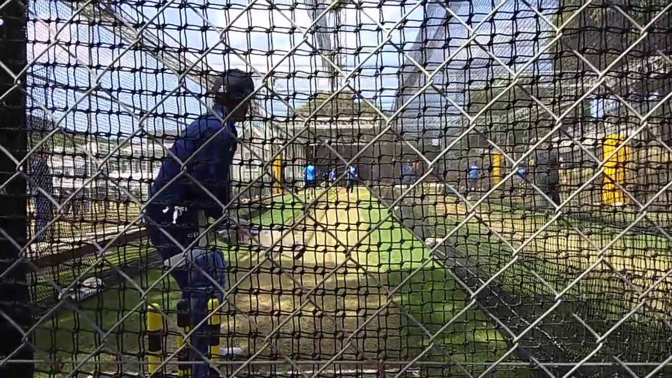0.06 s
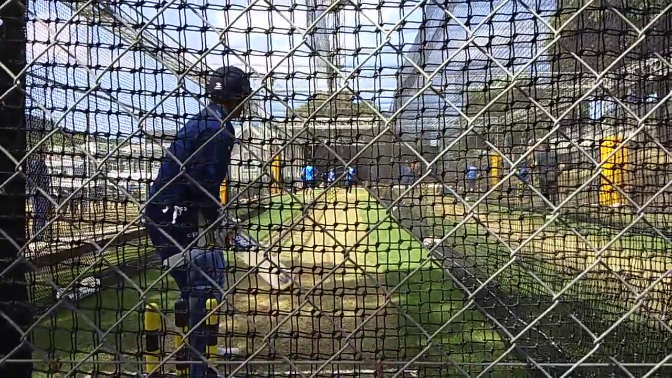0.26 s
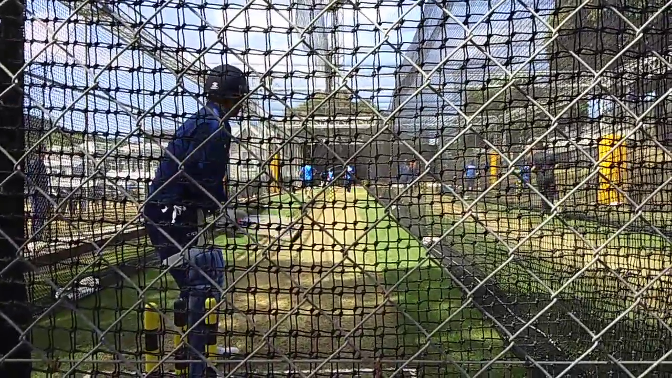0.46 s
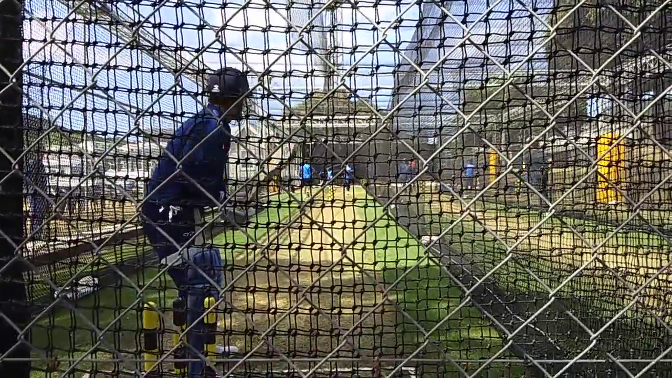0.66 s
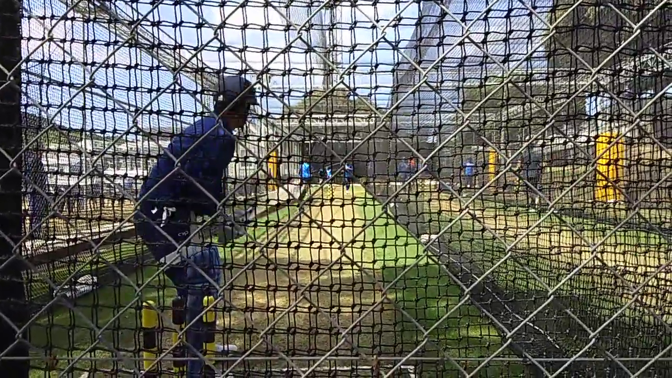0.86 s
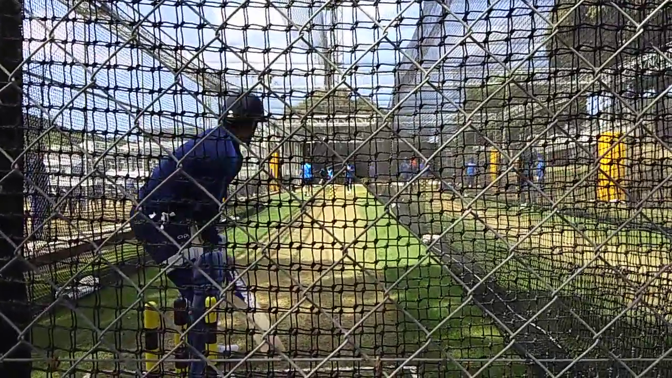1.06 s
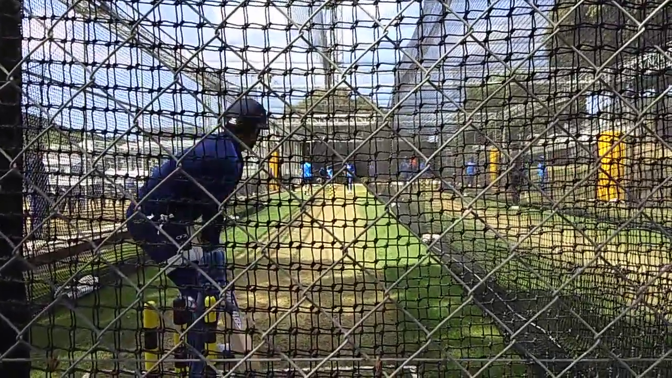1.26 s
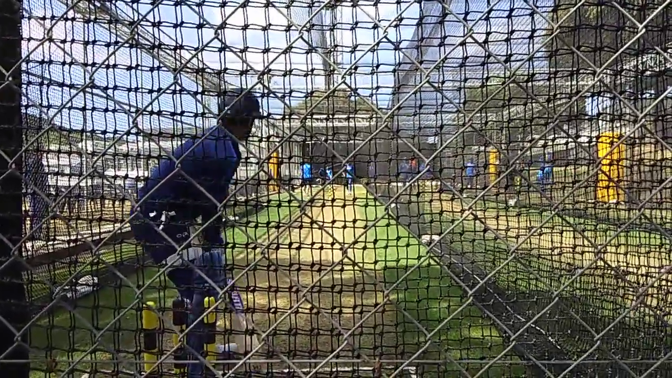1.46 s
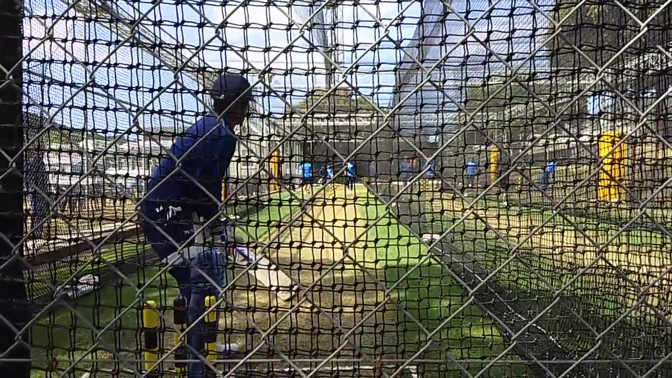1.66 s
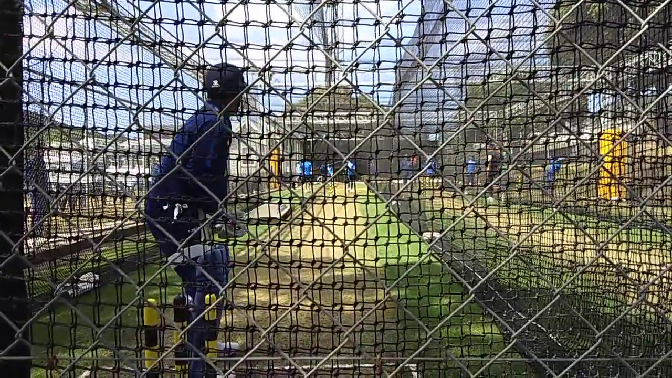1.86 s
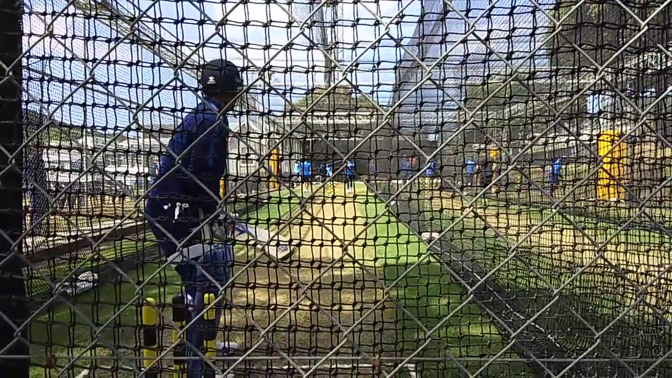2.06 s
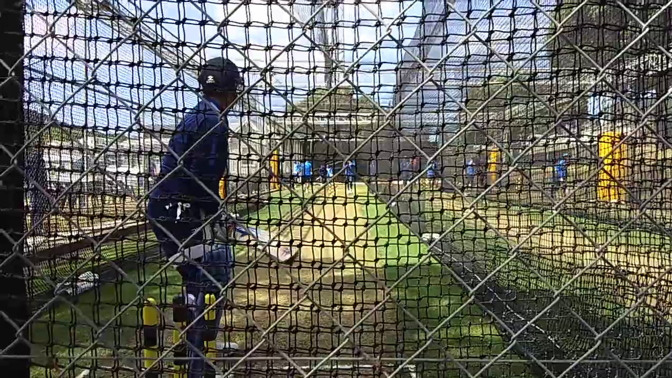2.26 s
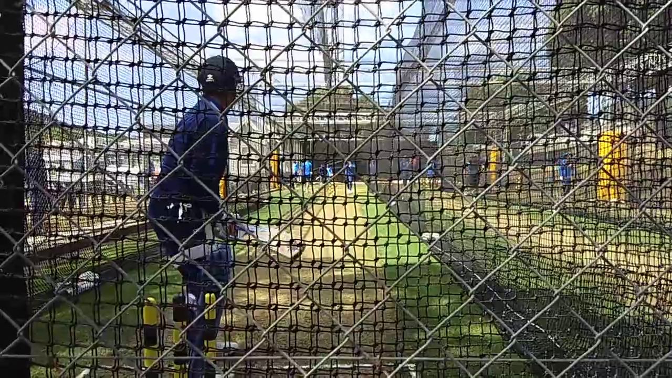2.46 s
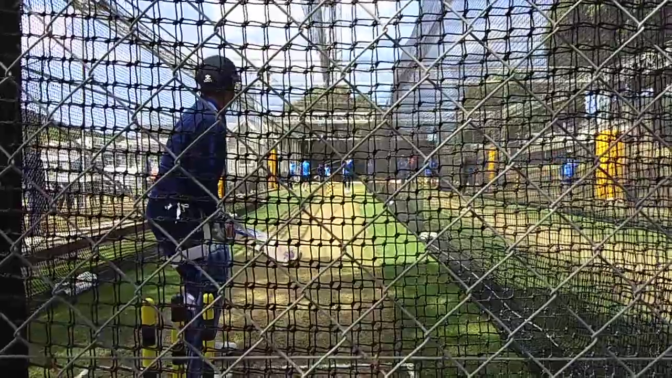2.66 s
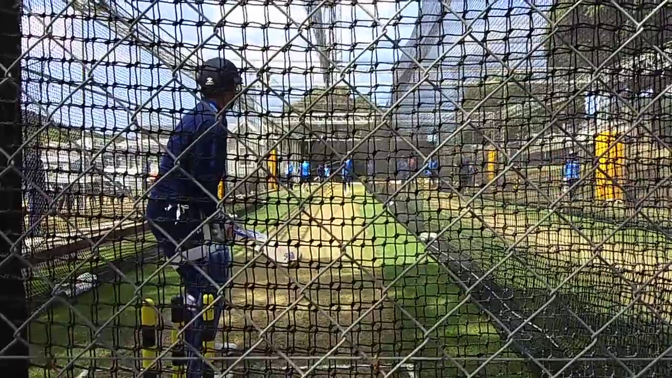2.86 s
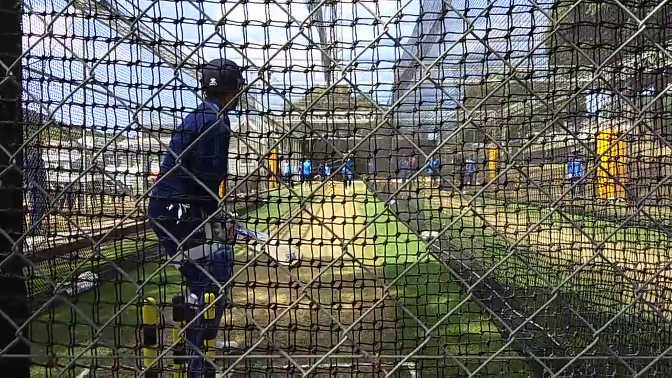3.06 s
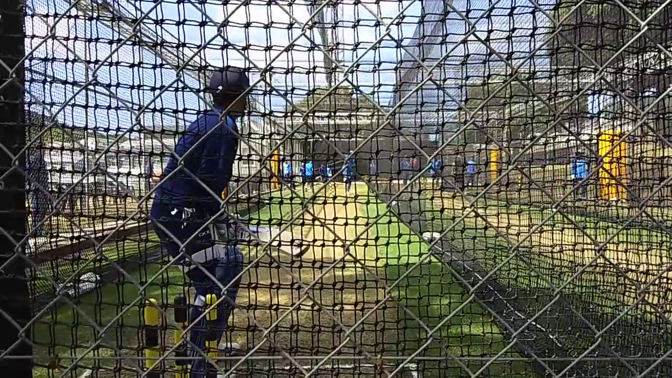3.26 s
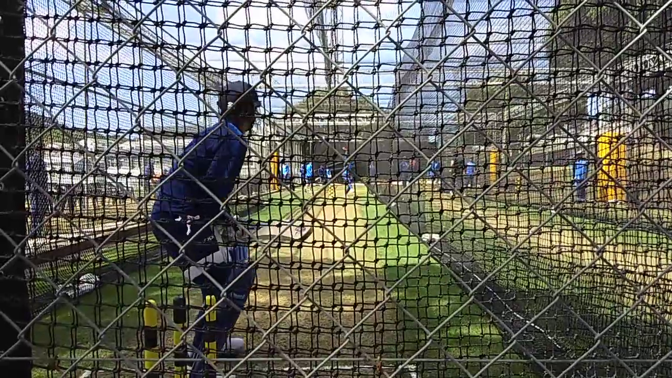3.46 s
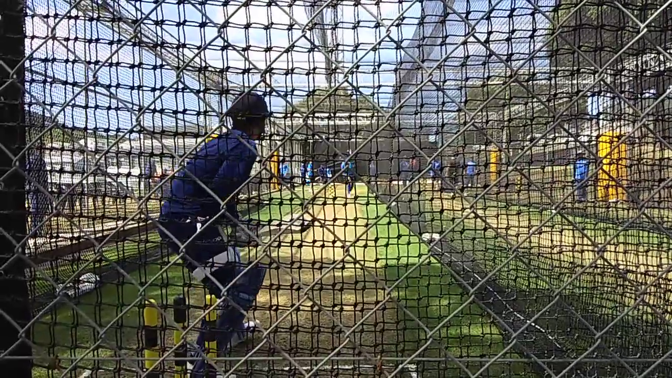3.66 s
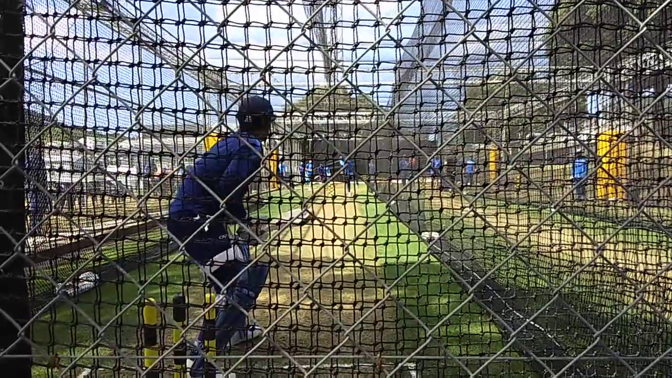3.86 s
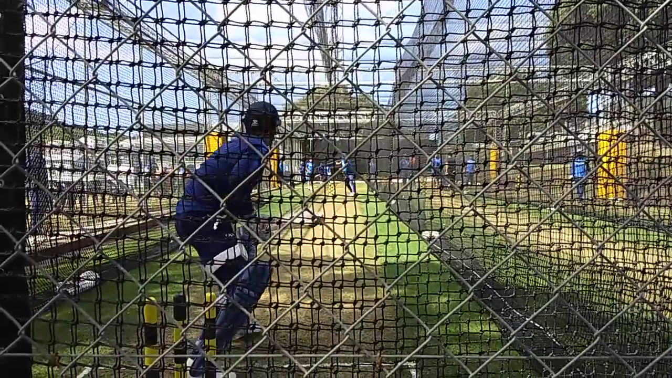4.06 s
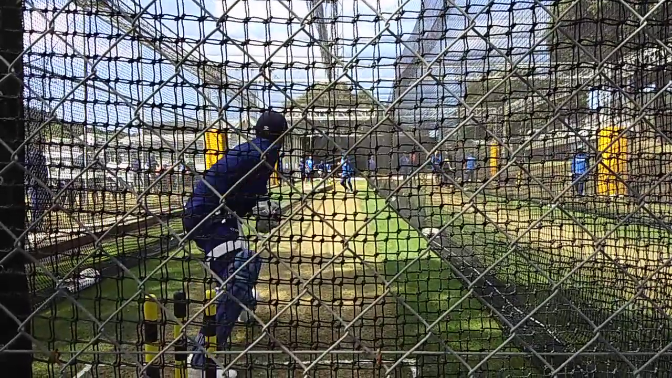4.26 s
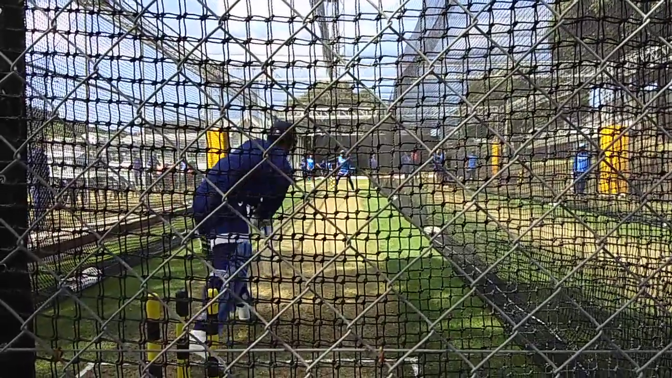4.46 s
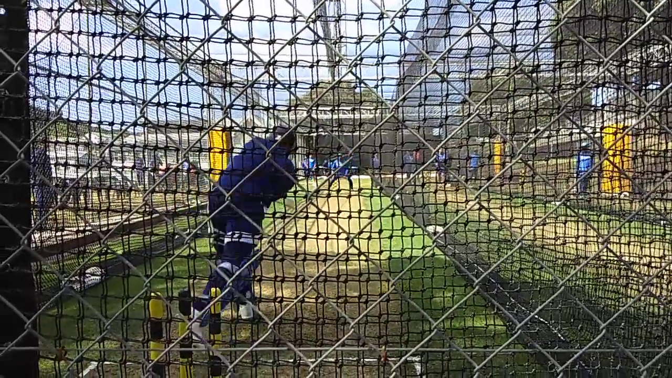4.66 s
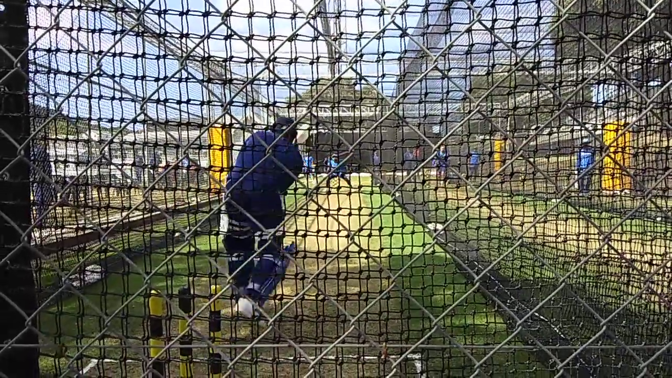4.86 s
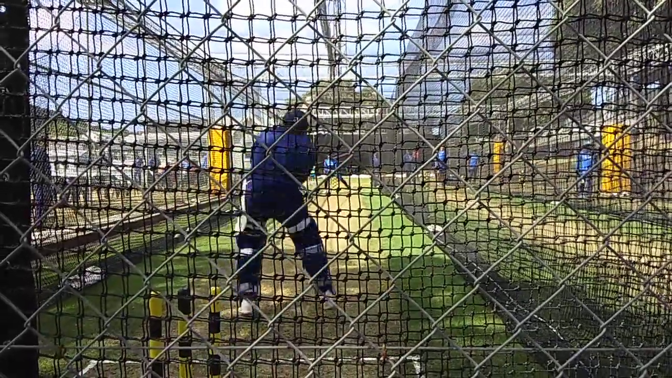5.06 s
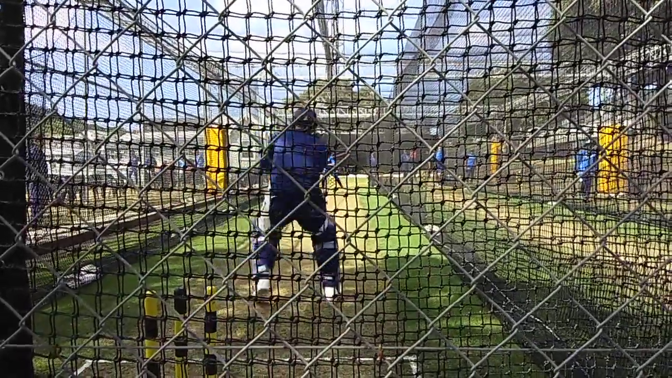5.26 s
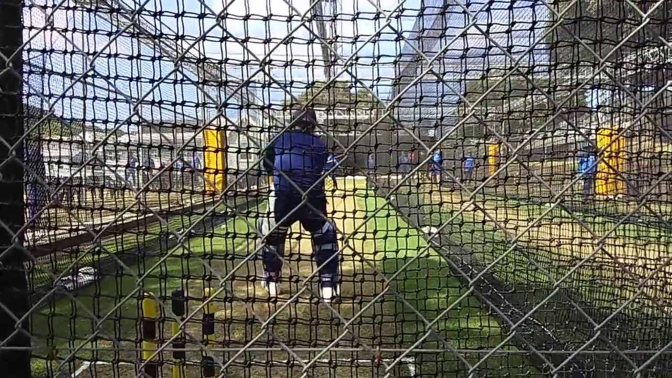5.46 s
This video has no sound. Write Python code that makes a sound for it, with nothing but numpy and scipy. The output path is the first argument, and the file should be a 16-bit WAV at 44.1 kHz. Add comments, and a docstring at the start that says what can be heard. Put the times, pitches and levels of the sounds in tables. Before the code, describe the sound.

Dull bat taps and thuds in outdoor cricket nets, a sharp crack from the next lane, then a louder near crack with slapping echoes.

```python
"""A bat cracks against a hard ball in the next lane, then in the near one, at outdoor cricket nets.
Each crack is a set of ringing blade tones under a noise snap; fences and stands return echoes of it.
Dull thuds of bat, feet and ball are short low tones; shoes, kit and treble spits are short noise
bursts, and netting shudders in soft beats. Behind lie faint knocks from far lanes and a city bed
of shaped noise with a thin whine. A phone microphone colours it and ducks after peaks."""
import sys
import numpy as np
from scipy import signal
from scipy.fft import rfft, irfft, next_fast_len
from scipy.io import wavfile
from scipy.ndimage import uniform_filter1d

SR = 44100
rng = np.random.default_rng(int(sys.argv[2]) if len(sys.argv) > 2 else 0)


def transcribe(signal):
    """Save signal, clipped to [-1, 1], as a 16-bit WAV file at the path in sys.argv[1]."""
    frames = np.atleast_2d(signal).T
    limited = np.clip(frames, -1, 1)
    pcm = np.round(limited * 32767).astype(np.int16)
    wavfile.write(sys.argv[1], SR, pcm)


N = 243431  # length in samples
T = np.arange(N) / SR  # time in seconds

# Bat on ball. Each row: start in seconds, level in dB, pitch of the blade tones as a ratio,
# time for the push to peak in ms, snap level in dB against the blade, left minus right in dB,
# lag of the left microphone port in ms.
CRACKS = [(2.134, -8.5, 1.18, 0.026, -5.5, -5.5, 0.28), (4.6160, 0, 1.077, 0.01, -6.5, 4, 0.025)]
# Tones of a willow blade. Each row: pitch in Hz, level in dB, time to fade by 60 dB in seconds.
BLADE_TONES = [(262.5, -14.5, .021), (686, -10.5, 0.017), (800, -4.5, 0.013), (1303, -8.5, .011),
               (1760, -17, .010), (2620, -30, .010), (3980, -9.5, 0.0087), (4640, -11.5, .009),
               (5220, -17, 0.0051)]
# Colour of splintery, gritty noise. Each row: frequency in Hz, level in dB.
SPLINTER_COLOUR = [(500, 8), (1000, 1), (2000, -9), (3200, -15), (4300, -8.5), (6500, -14), (8000, -16),
                   (10500, -9.5), (15500, -43)]
# Colour of the far echo, one list for each crack. Each row: frequency in Hz, level in dB.
FAR_COLOURS = [
    [(59, -53), (100, -19), (210, 0), (288, -5), (327, 0.5), (413, -3), (605, 5), (849, 3), (1010, -2),
     (1570, 2.5), (2450, -35.5), (5600, -21.5), (8190, -21), (14200, -46), (15800, -38)],
    [(59, -32), (100, 5), (156, 5), (205, 3), (295, -8), (342, -2), (511, -12), (673, 4), (1240, -16),
     (1750, -38), (2610, -16), (3030, -25), (4160, -14), (8370, -24), (15800, -41)],
]


def undb(db):
    """Turns decibels into a gain."""
    return 10 ** (np.asarray(db) / 20)


def pan(db):
    """Left and right gains for a level difference, left minus right."""
    return undb(np.array([[db], [-db]]) / 2)


def shape(points, hz):
    """Gain read from a table of Hz and dB, with straight lines on a log-frequency axis."""
    table_hz, table_db = np.transpose(points)
    return undb(np.interp(np.log(hz), np.log(table_hz), table_db))


def fade(t, t60):
    """A natural die-away that falls by 60 dB in t60 seconds."""
    return np.exp(-np.log(1000) * t / t60)


def add(out, s, sound):
    """Mixes a sound in, starting at s seconds."""
    i = int(round(s * SR))
    out[:, i:i + sound.shape[-1]] += sound[..., :N - i]


def wander(x, step):
    """A smooth random wander along x, with a new value every step."""
    knots = np.arange(0, x[-1] + step, step)
    return np.interp(x, knots, rng.standard_normal(len(knots)))


def resonance(centre, width):
    """Gain of a resonance with steep skirts, as a function of frequency; both settings in Hz."""
    return lambda hz: (1 + ((hz - centre ** 2 / hz) / (2 * width)) ** 2) ** -1.5


def noise(gain_at, size, ripple_db=0):
    """Coloured stereo noise: bass nearly alike in both ports, treble stronger on the left."""
    # Each row: frequency in Hz, side (difference) minus mid (shared) level in dB.
    width_table = [(60, -19.5), (200, -19.5), (380, -11), (700, -6), (1300, 2), (2400, -0.5), (15000, 0.5)]
    # Each row: frequency in Hz, left minus right in dB.
    lean_table = [(100, -.5), (2000, 0.5), (5000, 2.5), (8000, 5.5), (15000, 3.5)]
    m = next_fast_len(size + 512)
    hz = np.maximum(np.fft.rfftfreq(m, 1 / SR), 1)
    mid, side = np.exp(2j * np.pi * rng.random((2, len(hz))))  # random phases
    side = side * shape(width_table, hz)
    lean = np.sqrt(shape(lean_table, hz))
    # crossing paths ripple the spectrum, fully so only above 2 kHz
    ripple = undb(ripple_db * wander(hz, 70) * np.minimum(hz / 2000, 1))
    spectrum = np.array([(mid + side) * lean, (mid - side) / lean]) * gain_at(hz) * ripple
    y = irfft(spectrum, m)[:, :size]
    return y / np.sqrt(np.mean(y ** 2))


def wash(points, size, ripple_db=0):
    """Stereo noise with the colour of a table of Hz and dB."""
    return noise(lambda hz: shape(points, hz), size, ripple_db)


def patchy(x, depth_db, size):
    """Lets each narrow band swell and sink on its own, in patches about size samples long."""
    z = signal.stft(x, nperseg=size)[2]
    field = rng.standard_normal(z.shape[1:])
    field = uniform_filter1d(field, 2, axis=0)
    field = uniform_filter1d(field, 2, axis=1)
    y = signal.istft(z * undb(depth_db * field / field.std()), nperseg=size)[1][:, :N]
    return y / y.std()


def city_band(lo_hz, hi_hz):
    """One steep-sided slice of the city's noise."""
    # Each row: frequency in Hz, level in dB.
    city_colour = [(120, -33.5), (200, 8), (283, -2), (423, -12), (547, -10), (896, -9.5), (1290, -15.5),
                   (2150, -17), (3050, -31), (3590, -31.5), (4730, -36.5), (5180, -34.5), (7890, -35.5),
                   (14700, -33.5), (15800, -34.5)]

    def gain_at(hz):
        edges = (1 + (lo_hz / hz) ** 8) * (1 + (hz / hi_hz) ** 8)
        return shape(city_colour, hz) / np.sqrt(edges)
    return noise(gain_at, N)


def city(swell_db=0.86, swell_step_s=.12):
    """A fluttering rumble, a restless receding wash of far traffic, hiss, air and a passing whine."""
    # Each row: frequency in Hz, level in dB.
    rumble_colour = [(15, -58), (25, -27), (35, -23), (47, 3), (103, 6), (129, 3), (150, -6), (188, -1.5),
                     (302, -9.5), (420, -32), (550, -30.5), (920, -120)]
    # Level of the airy top. Each row: time in seconds, level in dB.
    air_levels = [(0, -68), (1.3, -66.5), (1.7, -60.5), (2.5, -62.5), (2.8, -66), (3.2, -65), (3.7, -70),
                  (5.0, -64.5), (5.52, -64)]
    # each drift below is a start level in dB plus a steady change in dB per second
    rumble = patchy(wash(rumble_colour, N), depth_db=6.0, size=1024) * undb(-44 + 0.5 * T)
    traffic_db = -47 - 0.64 * T + swell_db * wander(T, swell_step_s)
    traffic = patchy(city_band(368, 2800), depth_db=3.5, size=2048) * undb(traffic_db)
    hiss = patchy(city_band(2890, 7100), depth_db=5, size=1024) * undb(-58 + 0.17 * T)
    air_db = np.interp(T, *np.transpose(air_levels))
    air = patchy(city_band(7200, 22700), depth_db=2.5, size=1024) * undb(air_db)
    # a faint far whine fades in, holds and fades out
    whine_envelope = np.interp(T, [.4, .85, 2.2, 3.2], [0, 1, 1, 0])
    whine = noise(resonance(centre=3590, width=50), N) * whine_envelope
    return rumble + traffic + hiss + air + undb(-67.5) * whine


def far_knocks(count=22, level_db=-47, spread_db=4.0, centre_hz=620, octaves=0.57, width_share=0.45,
               t60=0.05):
    """Faint knocks from distant lanes, at random moments and blurred by the way."""
    out, t = np.zeros((2, N)), T[:SR // 8]
    for _ in range(count):
        s = rng.random() * T[-1]
        size, pitch = np.clip(rng.standard_normal(2), -2, 2)
        hz = centre_hz * 2 ** (octaves * pitch)
        blurred = fade(t, t60) * (1 - fade(t, 0.011))
        knock = noise(resonance(hz, width_share * hz), len(t)) * blurred
        add(out, s, undb(level_db + spread_db * size) * knock)
    return out


def ring(modes, t, contact_ms):
    """Fading tones pushed by a smooth contact; a longer contact sounds duller."""
    y = sum(undb(db) * np.sin(2 * np.pi * hz * t) * fade(t, t60) for hz, db, t60 in modes)
    age = t[t < .02] * 1000 / contact_ms
    push = age * np.exp(-age)
    return -signal.fftconvolve(y, push / push.sum())[:len(t)]


def ports(x, lag_ms):
    """A direct sound reaches the right microphone port first, the left one lag_ms later."""
    i = np.arange(len(x))
    left = np.interp(i - lag_ms * SR / 1000, i, x, left=0)
    return np.array([left, x])


def turf(hz, t60, contact_ms, tick_db, tail_db, tail_t60,
         knock_ratio=2.51, knock_db=-4, knock_t60=0.0094, lag_ms=0.18):
    """A dull blow gives a brief low tone and a higher knock, with a tick of grit and a low tail."""
    # Colour of the tail. Each row: frequency in Hz, level in dB.
    tail_colour = [(50, -31), (120, -9.5), (330, 1.5), (500, -13), (850, -20), (1500, -26), (5000, -50)]
    t = T[:SR // 2]
    body = ring([(hz, 0, t60), (hz * knock_ratio, knock_db, knock_t60)], t, contact_ms)
    # a small patch of ground radiates little bass, and grass swallows the top
    band = signal.butter(2, [0.46 * hz, 3.3 * hz], "band", fs=SR, output="sos")
    body = signal.sosfilt(band, body)
    tick = undb(tick_db) * wash(SPLINTER_COLOUR, len(t)) * fade(t, 0.085)
    low_tail = undb(tail_db) * wash(tail_colour, len(t)) * fade(t, tail_t60) * (1 - fade(t, 0.058))
    return ports(body, lag_ms) / np.abs(body).max() + tick + low_tail


def thuds(softness_db_per_ms=7):
    """Dull thuds of bat, feet and ball: a deeper one rings and lingers longer, a softer one has less grit."""
    # Each row: start in seconds, level in dB, body pitch in Hz, time for the push to peak in ms.
    blows = [(1.2363, -10, 314, 0.54), (1.470, -33.5, 288, 0.4), (2.0191, -9.5, 325, .14),
             (2.7842, -10, 176, 1.04), (2.7945, -7.5, 335, 0.51), (2.8239, -18.5, 156, 1),
             (3.572, -19, 306, 0.56), (4.493, -29.5, 250, 0.56)]
    cycles = 4.16  # the body falls by 60 dB in this many cycles
    out = np.zeros((2, N))
    for s, db, hz, contact_ms in blows:
        tail_t60 = 0.16 * (293 / hz) ** 1.03  # 0.16 s for a 293 Hz body
        tick_db = -30.5 - softness_db_per_ms * contact_ms
        thud = turf(hz, cycles / hz, contact_ms, tick_db, tail_db=-18.5, tail_t60=tail_t60)
        add(out, s, undb(db) * thud)
    return out


def burst(centre, width, length, grain_db=1.0, tail_db=-20, tail_t60=.13):
    """A short grainy burst that swells and sinks in one resonance, with a faint tail."""
    t = T[:SR // 3]
    grain = undb(grain_db * wander(t, .0015))
    age = np.minimum(t / length, 1)
    swell = np.sin(np.pi * age) ** 2 * grain
    after = undb(tail_db) * age ** 2 * fade(t, tail_t60)
    return noise(resonance(centre, width), len(t), ripple_db=4.5) * (swell + after)


def scuffs():
    """Shoes and kit rub with a mid rasp and a treble swish; spikes click on the hard pitch."""
    # Each row: start in seconds, level in dB, rasp centre in Hz, rasp width in Hz, length in seconds,
    # swish level in dB against the rasp, left minus right in dB.
    rubs = [(1.657, -45, 5030, 450, 0.025, -3, -4), (1.935, -54, 5000, 2300, 0.16, 1.5, -1),
            (4.048, -42, 3640, 800, 0.03, 1.5, 2), (4.468, -41, 4640, 1600, 0.042, -14, 2),
            (4.476, -47.5, 2830, 3000, 0.14, 0.5, 3), (4.53, -49.5, 4000, 1600, 0.022, 9, 8),
            (4.766, -41, 3600, 1100, 0.039, -20, 7.5), (5.189, -49, 4200, 2400, 0.064, 1, 5),
            (5.268, -54.5, 3380, 700, 0.069, -6, 2)]
    # Clicks as the front foot lands. Each row: start in seconds, level in dB.
    spike_clicks = [(4.480, -28), (4.4855, -29)]
    out = np.zeros((2, N))
    for s, db, centre, width, length, treble_db, pan_db in rubs:
        rasp = burst(centre, width, length)
        swish = undb(treble_db) * burst(centre=13100, width=17000, length=length)
        add(out, s, undb(db) * pan(pan_db) * (rasp + swish))
    for s, db in spike_clicks:
        add(out, s, undb(db) * burst(centre=1500, width=1700, length=0.006))
    return out


def bounces(knock_hz=760, ground_hz=275, ground_db=-3, ground_delay_s=.0022):
    """Just before each stroke the hard ball clicks and knocks on the pitch, then the ground gives."""
    # Each row: start in seconds, level in dB, click level and tail level in dB against the knock.
    pitchings = [(1.952, -22.5, -24, -9), (4.5417, -17, -7, -23)]
    out = np.zeros((2, N))
    for s, db, click_db, tail_db in pitchings:
        knock = turf(knock_hz, t60=0.0097, contact_ms=0.096, tick_db=-21.5, tail_db=tail_db,
                     tail_t60=0.065)
        add(out, s, undb(db) * knock)
        add(out, s, undb(db + click_db) * burst(centre=3000, width=2300, length=0.0019))
        ground = turf(ground_hz, t60=0.011, contact_ms=0.13, tick_db=-23.5, tail_db=-20, tail_t60=.083)
        add(out, s + ground_delay_s, undb(db + ground_db) * ground)
    return out


def spits(low_width_hz=1900, high_width_hz=6500, high_pan_db=10,
          rasp_hz=1700, rasp_width_hz=2000, rasp_db=-7):
    """A bright spit swells and sinks around each crack, in two treble bands over a fainter rasp."""
    # Each row: start in seconds, length in seconds, low band centre in Hz, its level in dB,
    # its left minus right in dB, high band centre in Hz, its level in dB.
    spit_table = [(2.115, .034, 6000, -23.5, -5, 12040, -18.5), (4.600, 0.024, 5170, -26, 13, 14400, -21.5)]
    out = np.zeros((2, N))
    for s, length, low_hz, low_db, pan_db, high_hz, high_db in spit_table:
        low = pan(pan_db) * burst(low_hz, low_width_hz, length)
        rasp = undb(rasp_db) * burst(rasp_hz, rasp_width_hz, length)
        high = pan(high_pan_db) * burst(high_hz, high_width_hz, length)
        add(out, s, undb(low_db) * (low + rasp) + undb(high_db) * high)
    return out


def radiate(x, lo_hz):
    """A small body radiates little bass."""
    return signal.sosfilt(signal.butter(2, lo_hz, "high", fs=SR, output="sos"), x)


def cracks(splinter_t60=0.025, bass_hz=170):
    """The hard ball rings the blade for a few milliseconds under a splintery snap."""
    out, t = np.zeros((2, N)), T[:SR // 8]
    for s, db, ratio, contact_ms, splinter_db, pan_db, lag_ms in CRACKS:
        tones = [(hz * ratio, tone_db, t60) for hz, tone_db, t60 in BLADE_TONES]
        blade = radiate(ring(tones, t, contact_ms), bass_hz)
        snap = wash(SPLINTER_COLOUR, len(t), ripple_db=3.5) * fade(t, splinter_t60)
        add(out, s, undb(db) * (pan(pan_db) * ports(blade, lag_ms) + undb(splinter_db) * snap))
    return out


def tail(colour, t, t60, treble_share=0.71, split_hz=7000, ripple_db=3):
    """A diffuse echo whose treble dies sooner."""
    y = wash(colour, len(t), ripple_db)
    low = signal.sosfiltfilt(signal.butter(3, split_hz, fs=SR, output="sos"), y)
    return low * fade(t, t60) + (y - low) * fade(t, t60 * treble_share)


def scatter(lumps_db=2.5, near_rise_s=0.016, far_rise_s=0.045):
    """Fences scatter a crack at once and the steel net frame sings; the stands answer later, in lumps."""
    # Colour of the near scatter, one list for each crack. Each row: frequency in Hz, level in dB.
    near_colours = [
        [(59, -62), (100, -16), (364, -15.5), (441, -13.5), (479, -14.5), (732, -10), (814, -11.5), (1120, -15),
         (1780, -14), (3740, -28), (5140, -26), (5720, -22), (7530, -27.5), (10300, -21), (15800, -26)],
        [(59, -49), (100, -20), (150, -26), (219, 0.5), (334, -5), (868, -4.5), (1050, -15), (1170, -2),
         (1640, -25), (2670, -10.5), (3230, -22), (4070, -18), (6220, -25), (8190, -24.5), (15800, -23.5)],
    ]
    # One row for each crack: near level in dB, its 60 dB fade in seconds, far level in dB,
    # its delay in seconds, its 60 dB fade in seconds, frame level in dB.
    scatter_table = [(-16, 0.43, -20, .058, 0.46, -39.5), (-25, 0.63, -33, 0.074, 0.56, -55.5)]
    # Tones of the frame. Each row: pitch in Hz, level in dB, time to fade by 60 dB in seconds.
    frame_tones = [(763, 7, 0.482), (1340, 4, 0.39), (1290, 6, 0.83), (1460, 4, 0.64), (1650, -15, 0.46),
                   (1700, -5, 0.555), (1900, 11, 0.56), (2080, -12, .55), (2620, -18.5, .5)]
    out, t = np.zeros((2, N)), T[:SR]
    for (s, *_), near_colour, far_colour, row in zip(CRACKS, near_colours, FAR_COLOURS, scatter_table):
        near_db, near_t60, far_db, delay, far_t60, frame_db = row
        lumps = undb(lumps_db * wander(t, .004))
        near = tail(near_colour, t, near_t60) * lumps * (1 - fade(t, near_rise_s))
        add(out, s, undb(near_db) * near)
        far = tail(far_colour, t, far_t60) * lumps * (1 - fade(t, far_rise_s))
        add(out, s + delay, undb(far_db) * far)
        # each frame tone is a very narrow band of noise
        frame = sum(undb(db) * noise(resonance(hz, 26.4), len(t)) * fade(t, t60)
                    for hz, db, t60 in frame_tones)
        add(out, s, undb(frame_db) * frame * (1 - fade(t, 0.043)))
    return out


def slap(ratio, contact_ms=0.11, smear_db=-14, smear_t60=0.08, bass_hz=260, lag_ms=0.19):
    """A flat wall throws the crack back whole, with its own tint and less bass."""
    t = T[:SR // 10]
    tint = rng.standard_normal((len(BLADE_TONES), 2))
    # the tint shifts each tone a little in pitch and level
    tones = [(hz * ratio * (1 + 0.11 * pitch), db + 1.7 * level, t60)
             for (hz, db, t60), (pitch, level) in zip(BLADE_TONES, tint)]
    whole = ports(radiate(ring(tones, t, contact_ms), bass_hz), lag_ms)
    smear = wash(FAR_COLOURS[0], len(t)) * fade(t, smear_t60)
    return whole + undb(smear_db) * smear


def slaps(fence_pan_db=8):
    """Each crack comes back from the fence on the left, then from one face of the stands after another."""
    # Each row: fence slap start in seconds, its level in dB, first stand slap start in seconds,
    # stands level in dB, stands left minus right in dB, pitch of the blade tones as a ratio.
    returns = [(2.156, -14, 2.195, -11, -6, 1.18), (4.628, -30, 4.697, -10, -0.5, 1.0)]
    # Faces of the stands: extra delay behind the nearest in seconds.
    face_delays = [0, .0135, .077, .162, .21]
    # Faces of the stands: level in dB, added to the stands level.
    face_levels = [-2, 3, -14.5, -22, -21]
    out = np.zeros((2, N))
    for fence_s, fence_db, stand_s, stand_db, pan_db, ratio in returns:
        add(out, fence_s, undb(fence_db) * pan(fence_pan_db) * slap(ratio))
        for delay_s, db in zip(face_delays, face_levels):
            add(out, stand_s + delay_s, undb(stand_db + db) * pan(pan_db) * slap(ratio))
    return out


def shudder(count=8, pitch_spread=0.17):
    """After the loudest thud the netting swings out in even, soft beats, each set weaker than the last."""
    start_s, period_s, centre_hz = 2.846, .039, 174
    first_db, fall_db_per_s = -26, 35
    out = np.zeros((2, N))
    for k, chance in enumerate(rng.standard_normal(count)):
        age = k * period_s
        hz = centre_hz * np.exp(pitch_spread * chance)
        beat = turf(hz, t60=0.051, contact_ms=0.91, tick_db=-39.5, tail_db=-19, tail_t60=0.11)
        add(out, start_s + age, undb(first_db - fall_db_per_s * age) * beat)
    return out


def scene():
    """Everything that reaches the microphone."""
    near = thuds() + shudder() + bounces() + scuffs()
    strokes = cracks() + spits() + scatter() + slaps()
    return near + strokes + far_knocks() + city()


def duck(x, threshold_db=-7, slope=0.75, release_db_per_s=7):
    """Gain control: a peak over the threshold turns the gain down just afterwards, and it creeps back."""
    level_db = 20 * np.log10(np.abs(x).max(axis=0) + 1e-9)
    over = np.maximum(level_db - threshold_db, 0) * slope
    # hold each peak and let it sink at the release rate
    held = np.maximum.accumulate(over + release_db_per_s * T) - release_db_per_s * T
    pole = np.exp(-1 / (0.054 * SR))  # smooths the gain over 54 ms
    return x * undb(-signal.lfilter([1 - pole], [1, -pole], held))


def record(dry):
    """The phone colours the sound, rounds the loudest peaks, ducks after them and cuts the top."""
    # Microphone colour. Each row: frequency in Hz, level in dB.
    mic_colour = [(20, -22.5), (60, -8.5), (150, -2), (300, 3.5), (400, 1), (500, -0.5), (700, 1),
                  (3000, -1), (6500, 0), (7400, -12.5), (8600, -11), (10000, -7), (15000, 0.5)]
    top_hz = 15750
    m = next_fast_len(N)
    hz = np.maximum(np.fft.rfftfreq(m, 1 / SR), 1)
    coloured = irfft(rfft(dry, m) * shape(mic_colour, hz), m)[:, :N]
    rounded = coloured / (1 + coloured ** 4) ** .25
    top_cut = signal.ellip(10, .2, 80, top_hz, fs=SR, output="sos")
    return signal.sosfilt(top_cut, duck(rounded))


dry = scene()
out = record(dry)
transcribe(out)
```